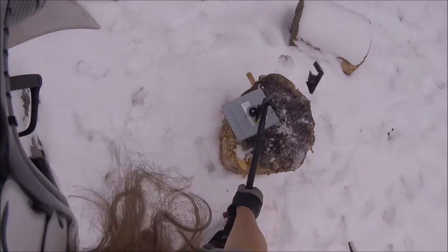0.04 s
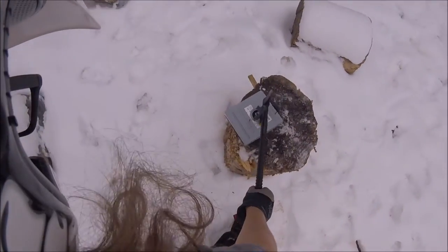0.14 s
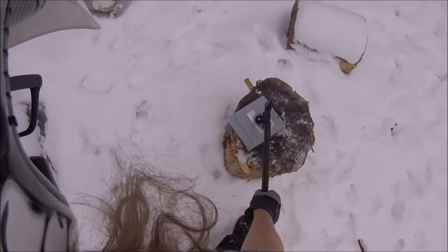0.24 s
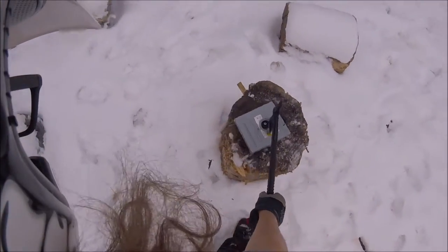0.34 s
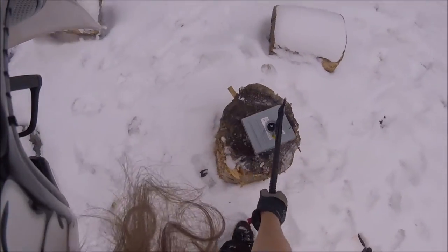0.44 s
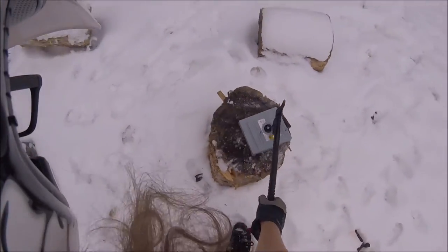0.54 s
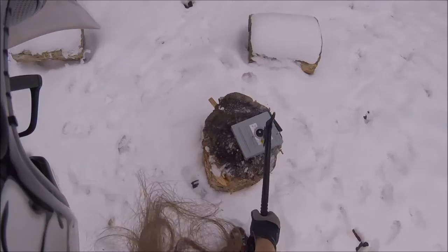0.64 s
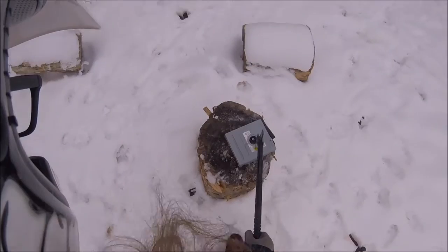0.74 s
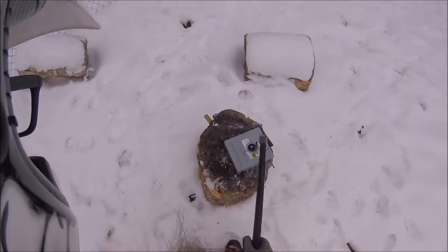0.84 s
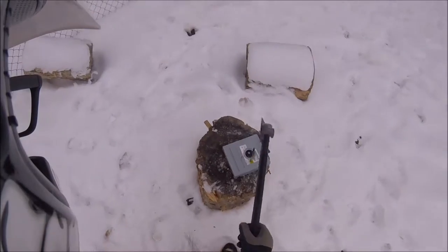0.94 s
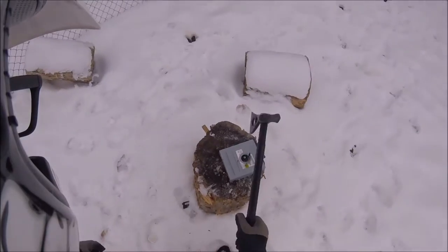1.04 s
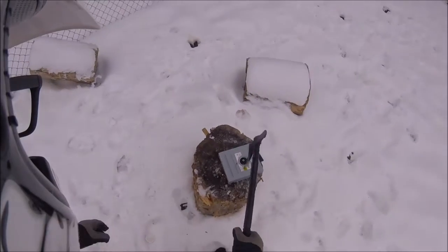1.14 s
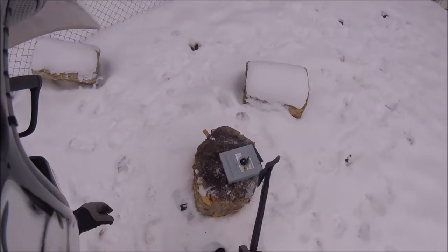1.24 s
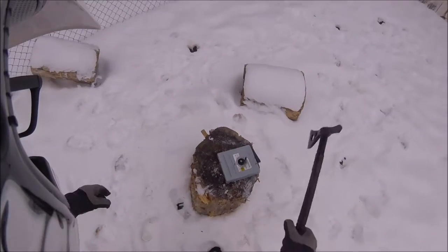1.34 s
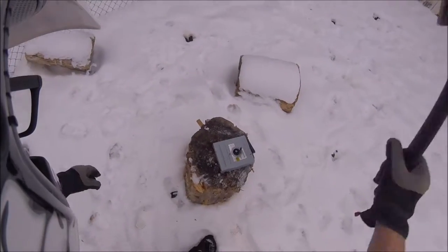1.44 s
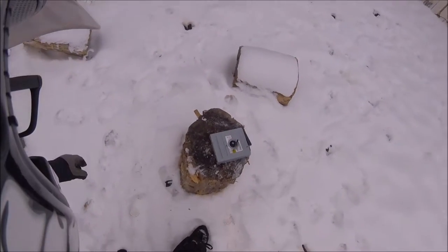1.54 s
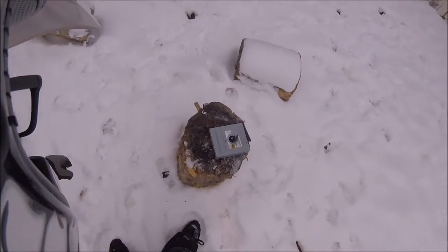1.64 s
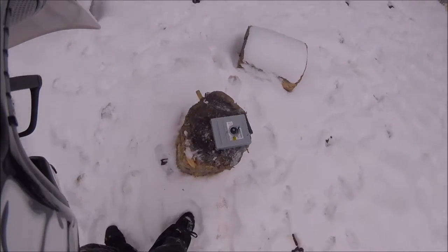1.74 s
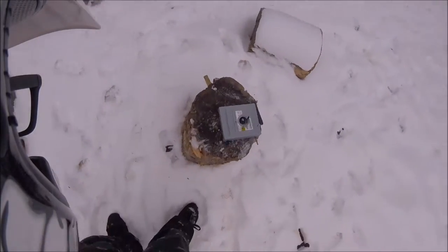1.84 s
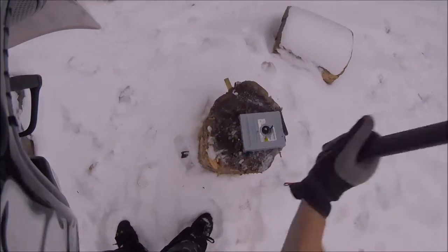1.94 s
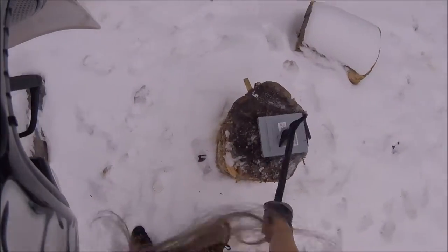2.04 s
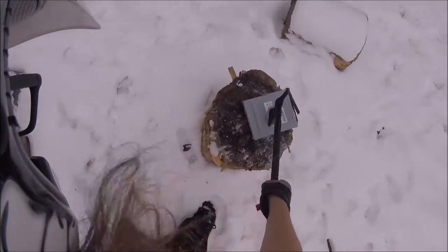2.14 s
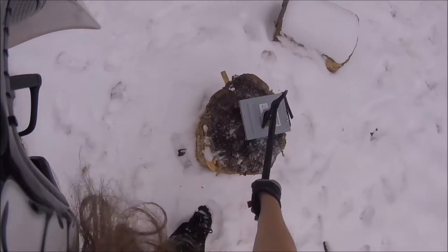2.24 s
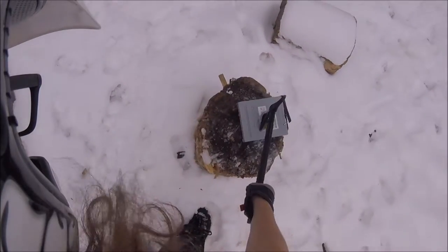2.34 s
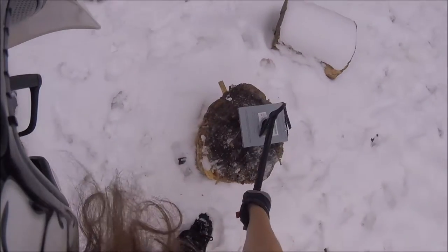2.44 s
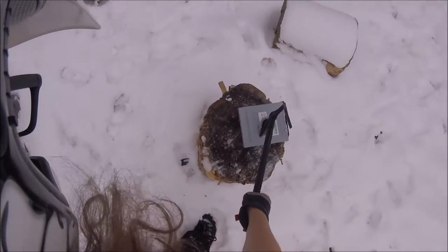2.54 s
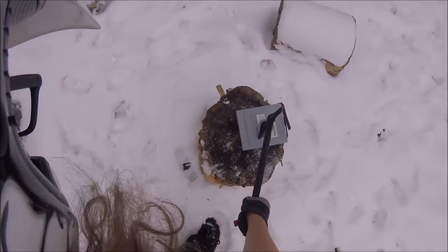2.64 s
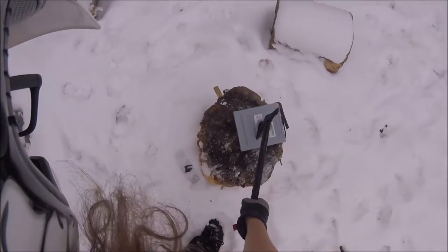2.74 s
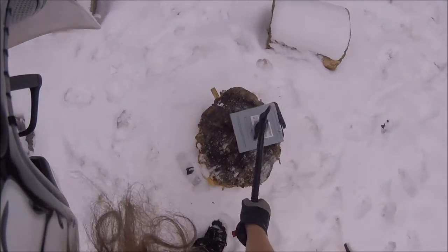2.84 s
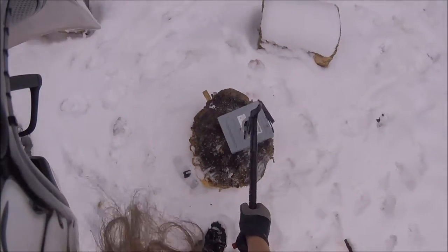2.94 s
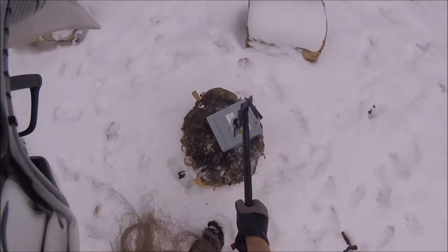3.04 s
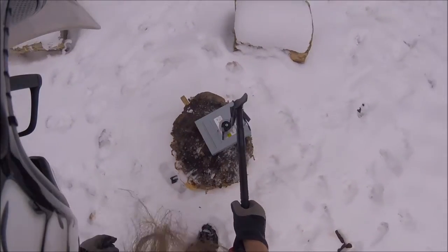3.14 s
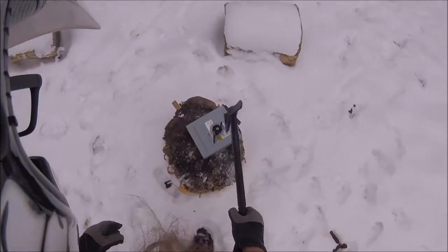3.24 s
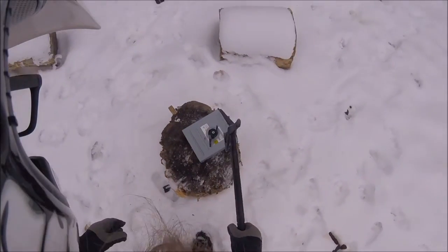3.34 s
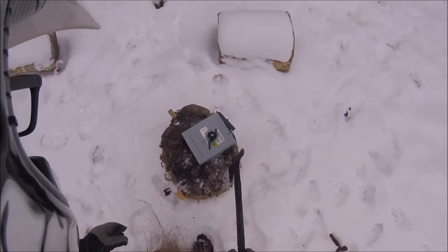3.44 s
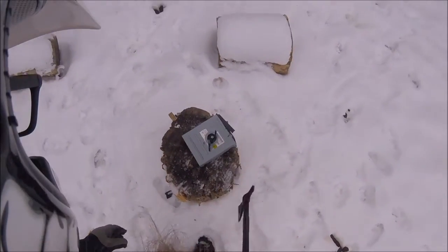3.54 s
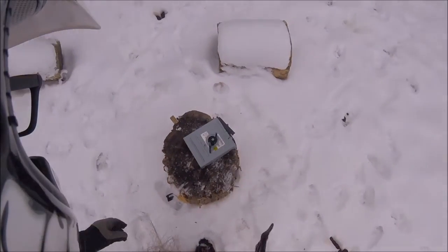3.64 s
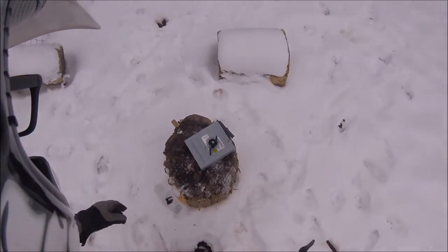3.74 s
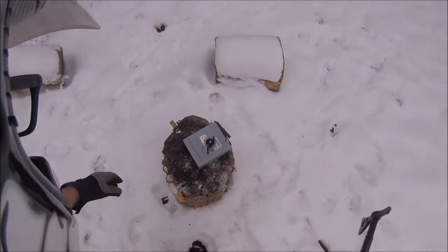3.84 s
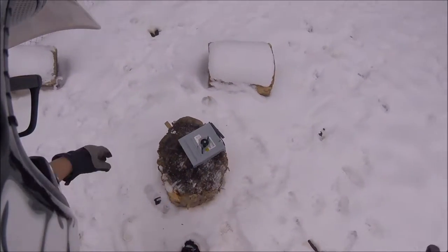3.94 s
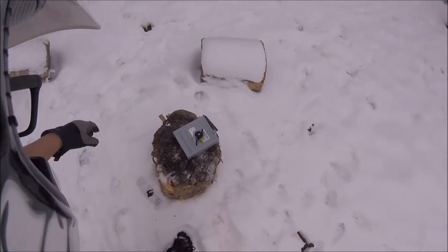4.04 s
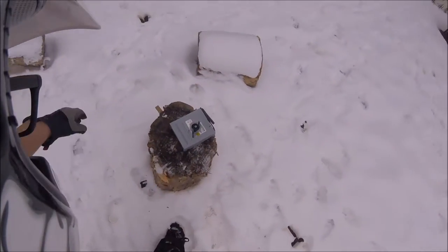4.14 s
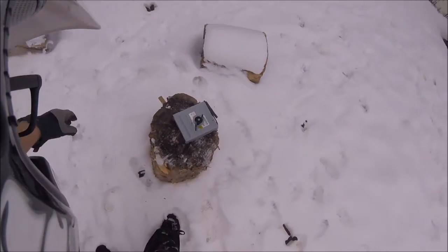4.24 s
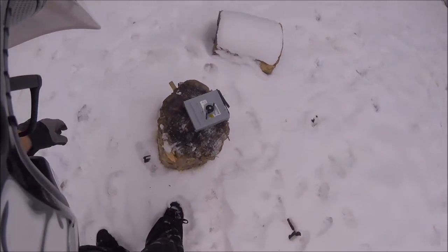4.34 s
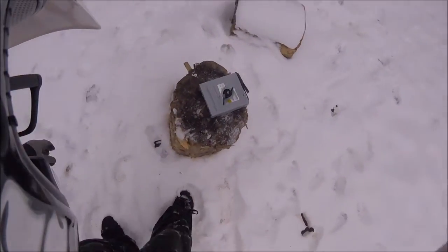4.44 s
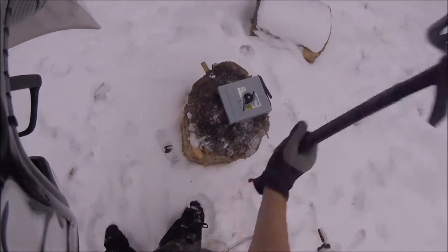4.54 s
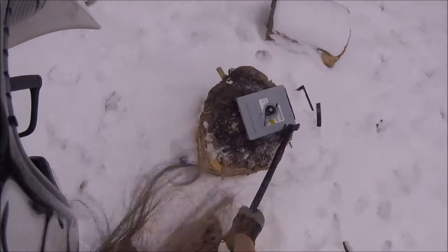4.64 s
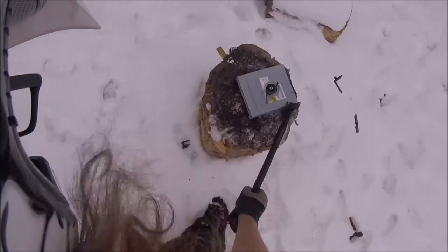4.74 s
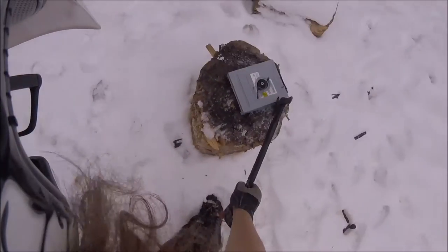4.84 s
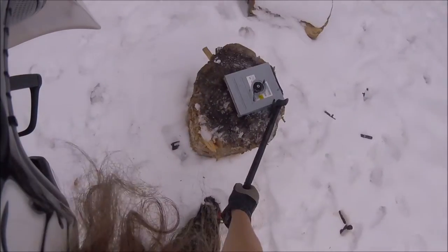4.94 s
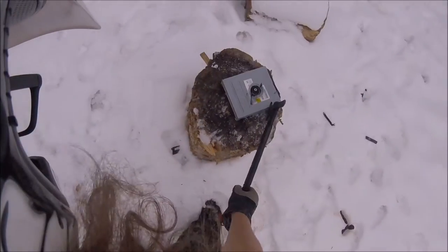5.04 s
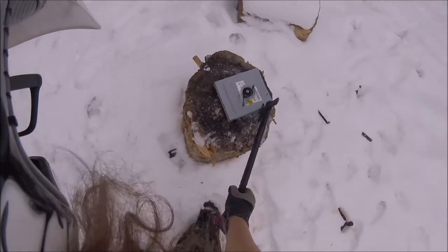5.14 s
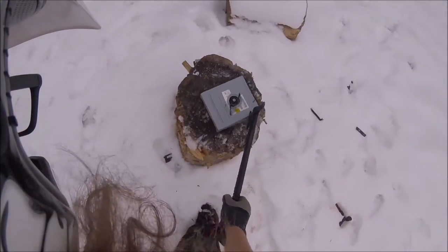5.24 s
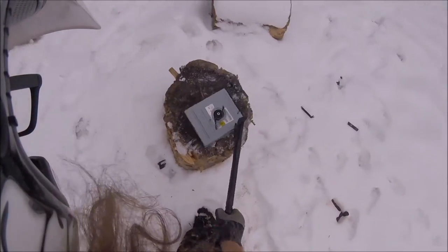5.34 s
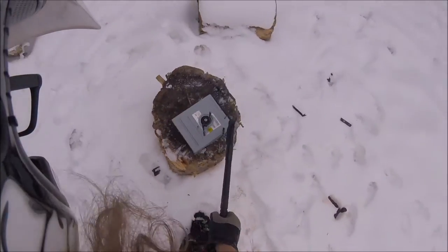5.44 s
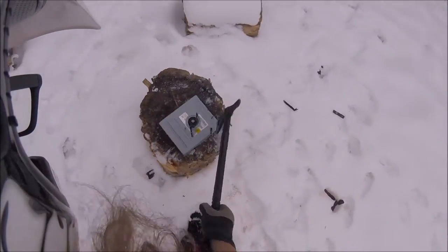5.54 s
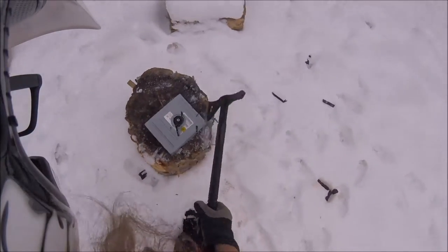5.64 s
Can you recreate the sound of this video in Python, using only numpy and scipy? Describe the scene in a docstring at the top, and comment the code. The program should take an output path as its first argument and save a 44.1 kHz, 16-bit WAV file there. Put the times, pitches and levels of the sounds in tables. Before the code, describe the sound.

Close body-worn microphone outdoors: soft metallic scuffs, near silence, a low whoosh, then a hard crack of hatchet on sheet metal, ringing very briefly. More scraping and a hollow knock follow around three seconds. After another pause and gust, a heavier crunching blow shakes the case and stump, leaving rattles, light scrapes and ticks in still air with faint yard echo.

```python
"""Snowy yard: a hatchet chops twice into a small sheet-metal case on a stump, heard from a body-worn camera.
Each chop is ringing panel modes, crumpling grains, a snap and a thud, then rattle and a low shudder.
Before, between and after the chops the case scrapes and knocks: random grains drive the same panel modes.
Swings are bell-shaped gusts of noise on the microphone; ticks, a thin yard echo and quiet air surround them.
The camera's limiter ducks just ahead of each chop and lets the background swell back."""
import sys
import numpy as np
from scipy import signal
from scipy.fft import rfft, irfft
from scipy.io import wavfile
from scipy.ndimage import uniform_filter1d

SR = 44100
rng = np.random.default_rng(int(sys.argv[2]) if len(sys.argv) > 2 else 0)


def waveform_to_disk(signal):
    """Save audio, clipped to [-1, 1], as 16-bit WAV at the path in sys.argv[1]."""
    frames = np.transpose(np.atleast_2d(signal))
    scaled = np.clip(frames, -1, 1) * 32767
    samples = np.round(scaled).astype(np.int16)
    wavfile.write(sys.argv[1], SR, samples)


N = 250488  # length in samples

# Levels in the tables are relative; each layer adds its own trim.
# still winter air and microphone hiss: [freq_hz, level_db]
AIR_COLOUR = [(20, 1), (100, 0), (200, -12.5), (380, -10.5), (600, -14.5), (800, -11.5), (1100, -18.5),
              (2600, -25), (4000, -35), (5900, -32.5), (6500, -20), (7200, -26.5), (10200, -35.5),
              (14000, -43.5)]
# sharp ticks of blade and grit on the metal: [start_s, level_db]
TICKS = [(0.657, -53), (0.723, -55), (2.288, -45), (3.016, -40), (3.136, -49.5), (3.565, -54),
         (4.246, -54.5), (4.719, -26.5), (5.018, -49.5), (5.361, -48), (5.444, -57), (5.606, -52.5)]
# colour of the yard's echo: [freq_hz, level_db]
YARD_COLOUR = [(100, -10.5), (350, -11), (800, -8.5), (1500, -4.5), (2600, 3.5), (5300, -6), (8000, -2),
               (13000, -9)]
# modes of the case: [freq_hz, t60_s in a chop, lid_level_db, edge_level_db]
CASE_MODES = [(547, 0.04, -16.5, -31), (733, 0.017, 1.5, -46.5), (755, 0.09, -23, -41),
              (830, 0.031, -26, -6.5), (1214, .03, -20.5, -26.5), (1386, 0.06, -27.5, -39.5),
              (1792, 0.045, -30.5, -20), (1926, .04, -21, -23.5), (2150, 0.05, -32.5, -21),
              (2703, .03, -28.5, -31.5), (2940, 0.034, -24, -34.5), (3074, .025, -20, -31),
              (3270, .04, -28.5, -23), (3440, .05, -35.5, -28.5), (3930, 0.029, -30, -31),
              (4170, 0.082, -35.5, -33.5), (4690, 0.024, -30.5, -16), (4920, 0.048, -18.5, -30.5),
              (5252, 0.022, -16.5, -16.5), (5695, 0.024, -23.5, -16), (5710, 0.05, -22.5, -33.5),
              (6190, 0.069, -25.5, -33.5), (6500, .04, -29.5, -20.5), (7406, .03, -28, -30)]
# colour of the case rubbing on frozen wood: [freq_hz, level_db]
RUB_COLOUR = [(150, -30), (370, -11), (440, -9.5), (560, 2), (720, 0.5), (880, 4.5), (1100, -8.5),
              (1380, -1), (1580, -12), (1950, -8), (3900, -16), (5000, -10.5), (6300, -12), (7500, -25.5),
              (10000, -35), (14000, -48.5)]
# shoves that slide the case over the stump: [start_s, length_s, level_db, growth_db over its length,
# treble_db at 3 kHz]
SHOVES = [(0.249, 0.067, -53, 4.5, -0.5), (0.335, 0.16, -37.5, -5.5, -0.5), (0.523, 0.025, -41.5, -0.5, -6),
          (0.579, 0.013, -34, 2, -4), (0.629, 0.032, -36.5, -4, -2), (2.856, 0.059, -50.5, 5.5, -4.5),
          (2.927, 0.027, -33.5, 5, 3), (2.994, 0.19, -38, -9.5, 1.5), (4.733, 0.083, -25, -2.5, 2),
          (5.239, 0.22, -46, 4, -1)]
# the case catching, tipping and dropping back: [start_s, level_db, treble_db at 5 kHz, pitch_hz of the spot]
KNOCKS = [(0.313, -38.5, -2, 802), (0.470, -34.5, 5, 762), (0.583, -37, -7.5, 630), (0.596, -27, 3, 624),
          (0.64, -39.5, -8, 690), (2.138, -22, 1, 760), (2.196, -23, -1, 786), (2.925, -39, -12, 500),
          (2.988, -22.5, 4.5, 550), (3.065, -34, 4, 776), (4.738, -19.5, 1, 630), (4.754, -16.5, 3, 576),
          (4.787, -19, 3, 865), (5.253, -43.5, -6, 830), (5.403, -41, 1, 930), (5.485, -33.5, -10, 583)]
# swings of the hatchet: [downstroke_s, gust_width_s, downstroke_level_db, lift_level_db]
SWINGS = [(1.966, 0.026, -30.5, -46), (4.52, 0.042, -34.5, -53)]
# colour of the air buffeting the microphone: [freq_hz, level_db]
BUFFET_COLOUR = [(15, -1.5), (30, 7.5), (80, -3), (140, -12), (250, -26), (600, -39), (1500, -46),
                 (6000, -50.5), (14000, -78.5)]
# colour of the flutter in the arm's gust: [freq_hz, level_db]
FLUTTER_COLOUR = [(30, -4), (80, 5.5), (130, 5), (200, -15), (350, -29), (1000, -47), (6000, -60),
                  (14000, -63)]
# chops: [start_s, level_db, place (0 lid to 1 edge), stretch_hz, crunch_db, crunch_t60_s,
# snap_delay_s, snap_db, thud_hz, thud_db, rattle_db]
CHOPS = [(2.0975, 4, 0, 420, -5, .03, .0024, 1, 440, -2, -29),
         (4.6781, 8.5, 0.7, 149.7, -5, 0.04, 0.0019, 3.5, 80.9, -6.5, -22.5)]
# colour of crumpling sheet metal: [freq_hz, level_db]
CRUNCH_COLOUR = [(150, -20), (500, -2.5), (950, -5), (1500, -5.5), (2400, -5.5), (4200, -5.5), (5400, -0.5),
                 (6800, -10.5), (8500, -15), (11000, -26.5), (14000, -27.5)]
# low shudder of hatchet and stump at each blow and rebound: [start_s, level_db, t60_s]
SHUDDERS = [(2.1, -28, 0.3), (2.19, -28.5, 0.4), (4.68, -18, 0.14), (4.736, -25, 0.24)]

AIR_DB = -53.5
GRIT_PER_S, GRIT_DB = 14, -67.5  # fainter ticks at random, on the scale of TICKS
TICK_T60_S = 0.045
CONTACTS_PER_S, CONTACT_SPREAD_DB = 7000, 2  # tiny impacts within a knock or tick
ECHO_DB, ECHO_RISE_S, ECHO_T60_S = -28, 0.015, 0.64
WANDER_DB, WANDER_PER_S = 6.5, 25  # how far and how fast the contact point shifts the modes' levels
SHOVE_ATTACK_S, SHOVE_T60_S = 0.0051, 0.098
SETTLE_DB, SETTLE_T60_S = -13.5, 0.34  # loosened grit runs on after each shove
SLIPS_PER_S, SLIP_SPREAD_DB, JUDDER_DB = 2200, 2.5, 2
KNOCK_T60_S, NOTE_T60_S, NOTE_DB = 0.074, 0.07, -1
LIFT_LEAD_S, LIFT_WIDTH_S = 0.17, 0.22  # the slow lift peaks this long before the downstroke
GUST_WIDTH_S, HEAD_LAG_S, HEAD_DB = 0.036, 0.074, 0.5  # the head's gust follows the arm's
FLUTTER_DB = -1.5
RATTLES_PER_S, RATTLE_T60_S = 800, 0.59
CLATTER_DB, CLATTER_T60_S = 7.5, 0.069  # the first violent shaking
BLOCK = 1377  # limiter step in samples
PEAK_LIMIT, TOP_HZ = 0.92, 14100  # hard ceiling (full scale 1) and treble cut-off


def undb(db):
    """Decibels to gain."""
    return 10 ** (np.asarray(db) / 20)


def unit(x):
    """Scale to rms 1."""
    return x / np.sqrt(np.mean(x ** 2))


def fade(t, t60):
    """Exponential decay, 60 dB down after t60."""
    return np.exp(-np.log(1000) * t / t60)


def add(out, start_s, x):
    """Mix x into out from start_s."""
    i = int(start_s * SR)
    out[i:i + len(x)] += x[:N - i]


def colour(x, points, size=4096):
    """Minimum-phase filter of unit power through (Hz, dB) points."""
    hz, db = np.transpose(points)
    bins_hz = np.fft.rfftfreq(size, 1 / SR)
    gain = undb(np.interp(np.log(bins_hz + 1), np.log(hz), db))
    # folding the cepstrum forward makes the response causal
    cepstrum = irfft(np.log(gain))
    cepstrum[1:size // 2] *= 2
    cepstrum[size // 2 + 1:] = 0
    response = irfft(np.exp(rfft(cepstrum)))
    return signal.fftconvolve(x, response / np.linalg.norm(response))[:len(x)]


def grains(count, rate, spread_db):
    """Tiny impacts or slips of uneven size and random sign at random moments, rms 1."""
    hit = rng.random(count) < rate / SR
    # the cap holds back rare giants
    size = undb(spread_db * np.minimum(rng.exponential(size=count), 4))
    sign = rng.choice([-1, 1], count)
    return unit(hit * size * sign + 1e-9)


def walk(rate):
    """Smoothed random drift, rms 1, heading for a new value rate times a second."""
    k = int(SR / rate)
    steps = np.repeat(rng.standard_normal(N // k + 1), k)
    return unit(uniform_filter1d(steps, k)[:N])


def air():
    """Quiet coloured noise for still air and microphone hiss, drifting slightly in level."""
    return unit(colour(rng.standard_normal(N), AIR_COLOUR)) * undb(AIR_DB + 0.38 * walk(3))


def ticks():
    """Bright clicks of blade and grit are short grain bursts, among a faint random scatter of grit."""
    push, t = np.zeros(N), np.arange(SR // 16) / SR
    grit_starts = rng.random(int(GRIT_PER_S * N / SR)) * N / SR
    grit = [(start_s, GRIT_DB) for start_s in grit_starts]
    for start_s, db in TICKS + grit:
        click = grains(len(t), CONTACTS_PER_S, CONTACT_SPREAD_DB) * fade(t, TICK_T60_S)
        add(push, start_s, undb(db + 5.5) * click)
    return colour(push, [(300, 3.5), (1800, -1.0), (3800, -6.5), (5600, 7), (7500, -3), (14000, -26.0)])


def yard(x):
    """Trees and walls scatter a thin, uneven echo over the absorbing snow."""
    t = np.arange(SR) / SR
    echo = grains(SR, 1800, 4.4) * (1 - np.exp(-t / ECHO_RISE_S)) * fade(t, ECHO_T60_S)
    response = colour(echo / np.linalg.norm(echo), YARD_COLOUR)
    return undb(ECHO_DB) * signal.fftconvolve(x, response)[:N]


def through_case(push):
    """Contact forces drive the damped box; as the contact point wanders, different panel modes stand out."""
    panel = 0
    for hz, t60, lid_db, edge_db in CASE_MODES:
        # no longer pinned by the blade, the panels ring a little longer
        keep = fade(1 / SR, 1.2 * t60)
        level = undb((lid_db + edge_db) / 2 + WANDER_DB * walk(WANDER_PER_S))
        drive = push * level * np.sqrt(1 - keep ** 2)
        resonator = [1, -keep * np.exp(2j * np.pi * hz / SR)]
        panel = panel + signal.lfilter([1], resonator, drive).imag
    return undb(-2.5) * colour(push, RUB_COLOUR) + undb(-4) * panel


def shove(length, growth_db):
    """Force of one shove: a quick rise, a hold that grows or eases, a release with a faint run-on."""
    t = np.arange(SR) / SR
    after = np.maximum(t - length, 0)
    hold = undb(growth_db * np.minimum(t / length, 1))
    run_on = undb(SETTLE_DB)
    release = (1 - run_on) * fade(after, SHOVE_T60_S) + run_on * fade(after, SETTLE_T60_S)
    return (1 - np.exp(-t / SHOVE_ATTACK_S)) * hold * release


def sliding():
    """The case slips over the rough stump in uneven spurts; blade on metal is brighter than case on wood."""
    push = np.zeros(N)
    for start_s, length, db, growth_db, treble_db in SHOVES:
        slips = grains(SR, SLIPS_PER_S, SLIP_SPREAD_DB)
        slips = colour(slips, [(1000, 0.0062), (3000, treble_db)], size=256)
        add(push, start_s, undb(db) * slips * shove(length, growth_db))
    return through_case(push * undb(-2.0 + JUDDER_DB * walk(70)))


def knocks():
    """Short clusters of contacts, dull or bright; each spot of the box has its own hollow note."""
    push, notes, t = np.zeros(N), np.zeros(N), np.arange(SR // 8) / SR
    for start_s, db, treble_db, hz in KNOCKS:
        burst = grains(len(t), CONTACTS_PER_S, CONTACT_SPREAD_DB) * fade(t, KNOCK_T60_S)
        add(push, start_s, undb(db) * colour(burst, [(1000, 0), (5000, treble_db)], size=256))
        note = np.sin(2 * np.pi * hz * t) * (1 - np.exp(-t / 0.0016)) * fade(t, NOTE_T60_S)
        add(notes, start_s, undb(db + NOTE_DB) * note)
    return through_case(push) + notes


def gust(centre_s, width_s):
    """A bell-shaped puff of air, down to 1/e at width_s either side of its centre."""
    return np.exp(-((np.arange(N) / SR - centre_s) / width_s) ** 2)


def swings():
    """Turbulence on the microphone: a slow lift, then the gusts of arm and hatchet head coming down."""
    slow, fast = 0, 0
    for down_s, width_s, db, lift_db in SWINGS:
        lift = undb(lift_db) * gust(down_s - LIFT_LEAD_S, LIFT_WIDTH_S)
        arm = undb(db) * gust(down_s, width_s)
        head = undb(db + HEAD_DB) * gust(down_s + HEAD_LAG_S, GUST_WIDTH_S)
        slow = slow + lift + head
        fast = fast + arm
    rumble = unit(colour(rng.standard_normal(N), BUFFET_COLOUR))
    flutter = unit(colour(rng.standard_normal(N), FLUTTER_COLOUR))
    # only the arm's fast gust flutters
    return (slow + fast) * rumble + undb(FLUTTER_DB) * fast * flutter


def ring(t, place, stretch_hz):
    """The case's modes for a blow at one place; the dented sheet is taut at first, so the pitch drops."""
    extra_turns = stretch_hz * np.cumsum(fade(t, 0.0072)) / SR
    out = 0
    for k, (hz, t60, lid_db, edge_db) in enumerate(CASE_MODES):
        # neighbouring modes move the panel in opposite directions
        size = (-1) ** k * undb(lid_db + place * (edge_db - lid_db))
        out = out + size * np.sin(2 * np.pi * (hz * t + extra_turns)) * fade(t, t60)
    return out


def chops():
    """The blade dents the sheet, which snaps and crumples; the pinned case rings briefly over a dull thud."""
    out, t = np.zeros(N), np.arange(SR // 4) / SR
    bite = 1 - np.exp(-(t / 0.00048) ** 2)
    for (start_s, db, place, stretch_hz, crunch_db, crunch_t60,
         snap_s, snap_db, thud_hz, thud_db, _) in CHOPS:
        panel = undb(8.5) * ring(t, np.clip(place, 0, 1), stretch_hz)
        crumple = grains(len(t), 16000, 0.53) * fade(t, crunch_t60)
        crunch = undb(crunch_db) * colour(crumple, CRUNCH_COLOUR)
        snap_shape = np.exp(-((t - snap_s) / 0.00057) ** 2)
        snap = undb(snap_db - 5) * np.sin(2 * np.pi * 5400 * t) * snap_shape
        thud = undb(thud_db) * np.sin(2 * np.pi * thud_hz * t) * fade(t, 0.018)
        add(out, start_s, undb(db + 4.0) * bite * (panel + crunch + snap - thud))
    return out


def rattle():
    """Each chop sets the loose parts of the case chattering, hard at first, until they settle."""
    push, t = np.zeros(N), np.arange(SR * 3 // 4) / SR
    shaking = fade(t, RATTLE_T60_S) + undb(CLATTER_DB) * fade(t, CLATTER_T60_S)
    for start_s, *_, rattle_db in CHOPS:
        add(push, start_s, undb(rattle_db) * grains(len(t), RATTLES_PER_S, 1.9) * shaking)
    uneven = push * undb(2.8 * walk(70))
    return through_case(colour(uneven, [(600, -6.5), (2500, 2.5), (6000, 2.5)], size=256))


def shudder():
    """Hatchet and stump shudder with a low buzz: dark noise that swells fast and dies away."""
    out, t = np.zeros(N), np.arange(SR // 2) / SR
    low = [(50, 0), (120, 7), (180, 0.5), (300, -19), (450, -17), (1000, -68)]
    for start_s, db, t60 in SHUDDERS:
        buzz = colour(rng.standard_normal(len(t)), low)
        add(out, start_s, undb(db) * buzz * (1 - np.exp(-t / 0.033)) * fade(t, t60))
    return out


def scene():
    """Everything that happens on the stump, its echo, the shudder, the swings and the air."""
    stump = ticks() + sliding() + knocks() + chops() + rattle()
    return (air() + stump + yard(stump) + swings() + shudder())[None]


def limiter(x, ceiling_db, treble_db, release_s, start_db):
    """Looks one block ahead, ducks at once to keep peaks under the ceiling and recovers slowly."""
    # the detector is more sensitive to treble, so bright blows are pressed down further
    highpass = signal.butter(1, 2500, "high", fs=SR, output="sos")
    sensed = x + undb(treble_db) * signal.sosfilt(highpass, x)
    peaks = np.maximum.reduceat(np.abs(sensed), np.arange(0, N, BLOCK))
    headroom_db = ceiling_db - 20 * np.log10(peaks + 1e-9)
    gains, db = [], start_db
    for k in range(len(peaks)):
        recovered_db = db * np.exp(-BLOCK / SR / release_s)
        db = min(recovered_db, headroom_db[k:k + 2].min())
        gains.append(db)
    # a short average rounds the steps between blocks
    return x * undb(uniform_filter1d(np.repeat(gains, BLOCK)[:N], size=64))


def record(dry):
    """The camera's limiter, low at first, then a hard ceiling on any overshoot and the treble cut-off."""
    held = limiter(dry[0], ceiling_db=4.0, treble_db=0.5, release_s=0.6, start_db=-8.5)
    clipped = np.clip(held, -PEAK_LIMIT, PEAK_LIMIT)
    lowpass = signal.ellip(8, .2, 70, TOP_HZ, fs=SR, output="sos")
    return signal.sosfilt(lowpass, clipped)[None]


dry = scene()
out = record(dry)
waveform_to_disk(out)
```